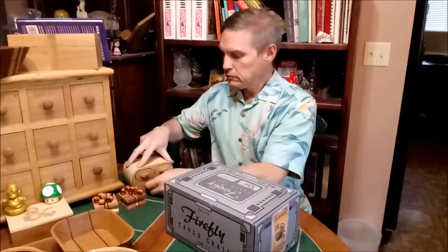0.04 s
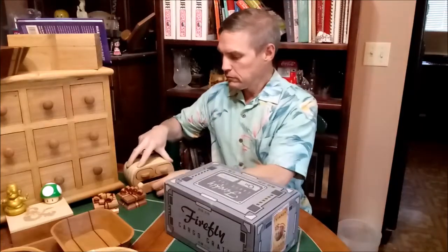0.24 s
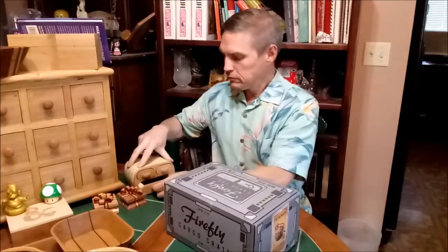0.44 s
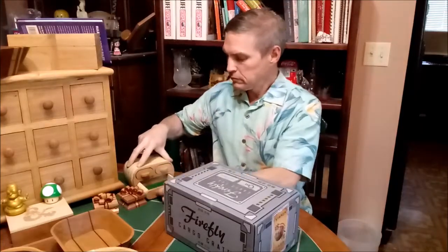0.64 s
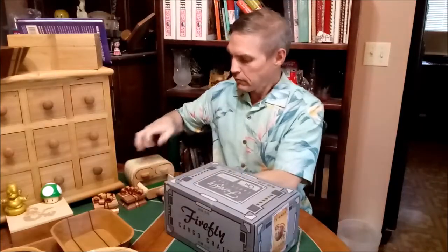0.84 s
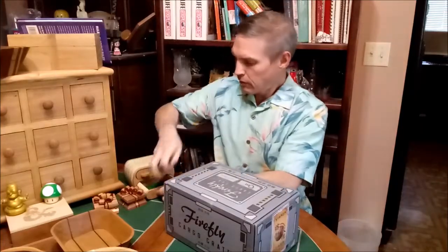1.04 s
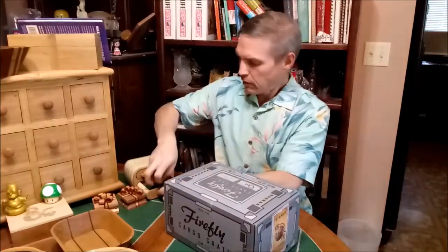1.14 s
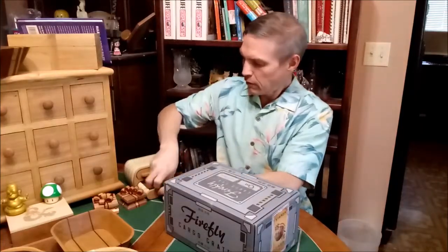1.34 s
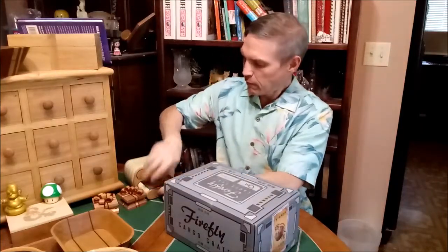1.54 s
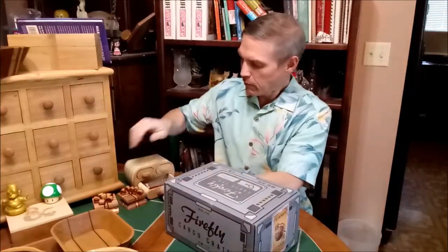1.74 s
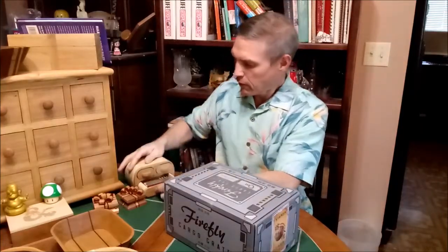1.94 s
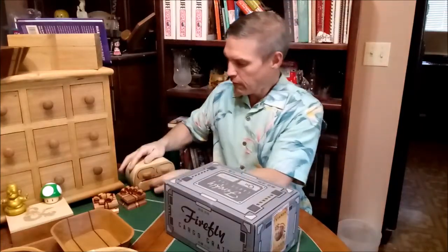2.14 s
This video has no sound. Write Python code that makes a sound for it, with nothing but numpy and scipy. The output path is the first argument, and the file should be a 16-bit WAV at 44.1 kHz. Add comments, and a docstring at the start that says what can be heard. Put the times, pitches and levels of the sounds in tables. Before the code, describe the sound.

A small wooden box is handled on a table indoors. Light taps and scrapes and a brief hollow slide lead to a cluster of sharper knocks and gritty scrapes, with a short room ring over faint hiss.

```python
"""Wooden box on a tabletop

A small wooden box is slid, turned and knocked on a table in a furnished room. Knocks and gritty
stick-slip scrapes ring the same short wooden modes; where the box is touched decides which speak.
A fingertip swishes, a panel glides in its grooves and a nail ticks on the wood.
The table thumps under the hand, and the room rings on over a faint hiss."""
import sys
import numpy as np
from scipy import signal
from scipy.fft import rfft, irfft
from scipy.io import wavfile

SR = 44100
rng = np.random.default_rng(int(sys.argv[2]) if len(sys.argv) > 2 else 0)


def file_out(sig):
    """Save sig as 16-bit WAV at sys.argv[1]."""
    # one column per channel
    cols = np.atleast_2d(sig).T
    # limit, then scale
    lim = np.clip(cols, -1, 1)
    pcm = np.round(lim * 32767).astype(np.int16)
    wavfile.write(sys.argv[1], SR, pcm)


N = 95961

# Colour of the hiss. Each row: frequency in Hz, relative level in dB.
HISS_SPECTRUM = [(40, 3), (120, 11.5), (250, 10.5), (1000, 9), (2500, 5), (5000, -2), (6800, -11),
                 (8500, -0.5), (11000, 2), (16000, -3.5)]
# The room's tail. Each row: band centre in Hz, t60 in seconds, level in dB.
ROOM_BANDS = [(120, 0.34, 0.5), (488, 0.49, -6.5), (890, 0.36, 1.5), (1500, 0.61, -4), (2800, 0.44, -1),
              (5370, 0.51, -6.5), (9000, .3, -11)]
# Pitches that linger in the room, in Hz, and the level of each in dB.
ROOM_RING_HZ = [420, 526, 974, 1186, 1267, 1364, 1488, 1549, 1633, 1787, 2814, 2960]
ROOM_RING_DB = [-32, -31.5, -31, -23, -27, -29, -28.5, -31.5, -28, -28, -34, -37.5]

# Boom of the table. Each row: frequency in Hz, t60 in seconds, level in dB.
TABLETOP_MODES = [(70.6, 0.052, -19.5), (125.3, 0.24, -4.5), (161, 0.2, -10), (246.7, 0.029, -7.5)]
# Hand and box bumping the table. Each row: start in seconds, level in dB.
TABLE_THUMPS = [(0.01, -37), (0.125, -33.5), (.895, -28.5), (1.336, -23), (1.4, -29), (1.488, -22.5),
                (1.658, -22), (1.696, -21), (1.763, -22), (2.091, -21.5)]
# Hollow ring of the sliding panel. Each row: frequency in Hz, t60 in seconds, level in dB.
SLIDE_MODES = [(454, .02, -17.5), (1328, 0.0066, -6), (1584, 0.012, 0.5), (2057, 0.029, -15),
               (2944, .018, -6), (3370, 0.0068, -13.5), (4740, .005, -6.5), (7350, .004, -27)]
# Wood ringing under a nail. Each row: frequency in Hz, t60 in seconds, level in dB.
NAIL_MODES = [(2950, 0.018, -0.5), (3730, 0.011, -4), (4500, 0.0032, -5.5), (5330, 0.0077, -4.5),
              (6200, 0.0045, -12), (10000, .002, -22)]
# Fingernail ticks. Each row: start in seconds, level in dB.
NAIL_TICKS = [(1.3202, -46.5), (1.3362, -23.5), (1.6541, -21.5)]

# Voice of the box. Each row: frequency in Hz, t60 in seconds, struck level in dB, rubbed level in dB.
WOOD_MODES = [(331, .03, -16.5, -17.5), (414.6, 0.079, -14, -5.5), (526, 0.052, -5.5, -0.5),
              (654, 0.014, -20, -16.5), (885.5, 0.023, -13, -8.5), (1034, 0.021, -13, -8.5),
              (1405, 0.011, -5.5, -3), (1573, 0.021, -3.5, -4), (1811, 0.013, -7, -6),
              (2513, 0.0035, -10, -15.5), (2917, 0.0086, -8.5, -5), (3315, 0.01, -15, -5.5),
              (3910, 0.0044, -21, -10), (4647, 0.0077, -13.5, -4.5), (5530, 0.0079, -23.5, -6.5),
              (7520, 0.0028, -19, -5)]
# Crossovers in Hz between its four mode families, low to high: thud, hollow, clack and edge.
FAMILY_SPLITS_HZ = [720, 1180, 1700]
# Scrapes of the box. Each row: fastest moment, rise and fall in seconds, level in dB, then the touch:
# thud, hollow and edge trims in dB against the clack, contact bandwidth in Hz, low-mode pitch ratio.
BOX_SCRAPES = [(0.276, 0.0563, 0.037, -64.5, 9, 12.5, 1, 9940, 0.99),
               (.335, 0.046, 0.027, -50, 2.5, 3, 1.5, 9800, 1.03),
               (0.495, 0.026, 0.027, -62.5, 11.5, 18, 0, 7000, 0.866),
               (0.894, 0.031, 0.016, -66, 7.5, -1, -25, 2900, 0.776),
               (1.362, 0.029, 0.047, -64.5, 2.5, -2, 8.5, 9000, 1.02),
               (1.637, 0.037, 0.037, -59.5, 9, 2, -4, 8070, 0.88),
               (1.727, 0.051, 0.06, -40, -7.5, -9, -5, 5350, 0.99),
               (2.078, 0.0447, 0.033, -50.5, 6, -39, -1.5, 7850, 0.93),
               (2.162, 0.0704, 0.1, -44.5, -1, -0.5, -4.5, 6390, 0.79)]
# Knocks and bumps. Each row: start in seconds, level in dB, then the same five touch settings.
BOX_KNOCKS = [(0.061, -50, 20.5, 15.5, -10, 1960, 0.89), (.113, -39, 18.5, 20, -16, 2500, 1),
              (.124, -44, 23, 19, -22, 1860, 1.15), (0.2, -44.5, 21.5, -4, -2, 2500, 1.2),
              (0.312, -23.5, -8, 15.5, -12, 4000, 0.992), (.322, -24.5, 5, -8, 0, 4000, 1.16),
              (.329, -20.5, 11.5, 2, -13, 4000, 1.04), (0.35, -29, 15, -22, 2.5, 5000, 0.87),
              (.490, -29.5, 12.5, 17, -22, 2500, 0.934), (0.522, -34, 17, 15.5, -17.5, 2000, 1.01),
              (0.879, -31, 14.5, 3.5, -20, 2950, 0.98), (.889, -33, 4, 1, -10, 2000, .85),
              (1.3985, -5, -24, -25, 7, 3090, 0.63), (1.4003, 3.5, -11, -21.5, 1, 3600, 1.02),
              (1.4050, -2.5, -7, -9.5, -18, 3000, 0.88), (1.441, -12, -6.5, -8.5, -23, 3000, 1.08),
              (1.490, -24.5, 7.5, -5, 14, 2430, 0.893), (1.527, -22.5, 6.5, -14, 7.5, 2540, 0.96),
              (1.564, -23.5, -17, -4, 6.5, 3960, 1.8), (1.611, -13.5, 0.5, -20, -24, 2540, 0.964),
              (1.6572, 6.5, -9.5, -28, -8.5, 5970, 1), (1.692, 5, -14, -17, -1, 5500, 0.96),
              (1.700, -4.5, -17, -13, -13, 4000, 0.84), (1.738, -9, -3, -7.5, 0, 2970, 1.036),
              (1.747, -8.5, -3.5, -12, 1, 2970, 0.88), (2.008, -23.5, -1, -25.5, -26, 3000, 0.963),
              (2.031, -32.5, 13, -6.5, -17, 2500, 1.05), (2.091, -12.5, 8, 1.5, -5, 4000, 1.024),
              (2.106, -22, 6.5, -11, 4.5, 5000, 0.88)]


def undb(db):
    """Decibels to gain."""
    return 10 ** (np.asarray(db) / 20)


def rolloff(x, order, hz, kind="low"):
    """Smooth low-pass or high-pass filter."""
    return signal.sosfilt(signal.butter(order, hz, kind, fs=SR, output="sos"), x)


def add(out, start_s, sound):
    """Mix a sound in at a given time."""
    i = max(int(start_s * SR), 0)
    out[i:i + len(sound)] += sound[:max(N - i, 0)]


def ring(hz, t60, db, build_cycles=0.76):
    """Damped modes that swell briefly and die, neighbours in opposite sign; db sets each one's energy."""
    t = np.arange(int(min(1.2 * max(t60), 1) * SR)) / SR
    cycles = hz[:, None] * t
    envelopes = (1 - np.exp(-cycles / build_cycles)) * np.exp(-np.log(1000) * t / t60[:, None])
    modes = envelopes * np.sin(2 * np.pi * cycles)
    gains = undb(db) * (-1) ** np.arange(len(hz)) / np.linalg.norm(modes, axis=1)
    return gains @ modes


def grit(decay_s):
    """A dying burst of noise with unit energy."""
    t = np.arange(SR // 20) / SR
    burst = rng.standard_normal(len(t)) * np.exp(-t / decay_s)
    return burst / np.linalg.norm(burst)


def contact(crunch_s, crunch_db):
    """Force of one touch: an impulse, then a short bright crunch as rough surfaces crush."""
    force = undb(crunch_db) * rolloff(grit(crunch_s), order=2, hz=3000, kind="high")
    force[0] += 1
    return force


def stroke(peak_s, rise_s, fall_s):
    """Speed of one push of the hand: it swells to its fastest moment and fades."""
    t = np.arange(N) / SR
    return np.exp(-((t - peak_s) / np.where(t < peak_s, rise_s, fall_s)) ** 2)


def hiss(level_db=-70.5):
    """A faint, steady bed of background noise."""
    hz, db = np.array(HISS_SPECTRUM).T
    f = np.arange(N // 2 + 1) * SR / N
    colour = undb(np.interp(np.log(f + 1), np.log(hz), db))
    noise = irfft(rfft(rng.standard_normal(N)) * colour, N)
    return undb(level_db) * noise / noise.std()


def room(direct, predelay_s=0.005, build_s=0.0016, ring_t60_s=0.48):
    """A diffuse tail that builds up and dies band by band, with a few lingering resonances."""
    t, f = np.arange(SR) / SR, np.arange(SR // 2 + 1)
    hz, t60, db = np.array(ROOM_BANDS).T
    spectrum, response = rfft(rng.standard_normal(SR)), np.zeros(N)
    for k, solo in enumerate(np.eye(len(hz))):
        band = irfft(spectrum * np.interp(np.log(f + 1), np.log(hz), solo), SR)
        envelope = (1 - np.exp(-t / build_s)) * np.exp(-np.log(1000) * t / t60[k])
        add(response, predelay_s, undb(db[k]) * band * envelope / np.linalg.norm(envelope))
    resonances = ring(np.array(ROOM_RING_HZ), np.full(len(ROOM_RING_HZ), ring_t60_s), ROOM_RING_DB)
    add(response, predelay_s, resonances)
    return signal.fftconvolve(direct, response)[:N]


def table_thumps():
    """Soft blows set the table's low modes booming."""
    out, table = np.zeros(N), ring(*np.array(TABLETOP_MODES).T)
    for start, db in TABLE_THUMPS:
        add(out, start, undb(db) * table)
    return rolloff(out, order=2, hz=400)


def fingertip_swish(centre_hz=4580, width_hz=1400, level_db=-71):
    """A fingertip brushes the wood with a thin, high hiss."""
    band = signal.iirpeak(centre_hz, centre_hz / width_hz, fs=SR)
    brush = signal.lfilter(*band, signal.lfilter(*band, rng.standard_normal(N)))
    return undb(level_db) * brush / brush.std() * stroke(peak_s=0.025, rise_s=0.07, fall_s=0.05)


def panel_slide(drive_db=-48.5):
    """A panel glides in its grooves: smooth friction lets its hollow modes ring freely."""
    friction = undb(drive_db) * rng.standard_normal(N) * stroke(peak_s=0.682, rise_s=0.06, fall_s=0.072)
    return signal.oaconvolve(friction, ring(*np.array(SLIDE_MODES).T))[:N]


def nail_ticks():
    """A nail catches the wood, drags on briefly and rings only its highest modes."""
    out, tick = np.zeros(N), ring(*np.array(NAIL_MODES).T)
    for start, db in NAIL_TICKS:
        scratch = contact(crunch_s=0.0051, crunch_db=3)
        add(out, start, undb(db) * signal.fftconvolve(scratch, tick))
    return rolloff(out, order=3, hz=7850)  # a soft nail gives little top end


def surface_snaps(trim_db=-42.5, centre_hz=9000, q=np.pi):
    """The struck surface spits a little high noise, in proportion to each knock."""
    out = np.zeros(N)
    for start, db, *_ in BOX_KNOCKS:
        add(out, start, undb(db + trim_db) * grit(decay_s=0.004))
    return signal.lfilter(*signal.iirpeak(centre_hz, q, fs=SR), out)


def box_ring(thud_db, hollow_db, edge_db, contact_hz, pitch, rubbed):
    """The box's ring for one touch: a softer contact dulls the high modes, the grip shifts the low ones."""
    hz, t60, struck_db, rubbed_db = np.array(WOOD_MODES).T
    family = np.searchsorted(FAMILY_SPLITS_HZ, hz)
    trim_db = np.array([thud_db, hollow_db, 0, edge_db])[family]
    db = (rubbed_db if rubbed else struck_db) + trim_db
    gripped_hz = np.where(family < 2, hz * pitch, hz)
    return rolloff(ring(gripped_hz, t60, db), order=2, hz=contact_hz)


def box_scrapes(slips_per_s=6000, table_send_db=-23.5):
    """Dense, uneven slips drive the box with each push; a share of the thud shakes the table."""
    out, table = np.zeros(N), ring(*np.array(TABLETOP_MODES).T)
    slips = (rng.random(N) < slips_per_s / SR) * rng.standard_normal(N)
    for peak, rise, fall, db, thud_db, *touch in BOX_SCRAPES:
        force = undb(db) * slips / slips.std() * stroke(peak, rise, fall)
        out += signal.oaconvolve(force, box_ring(thud_db, *touch, rubbed=True))[:N]
        out += undb(table_send_db + thud_db) * signal.oaconvolve(force, table)[:N]
    return out


def box_knocks():
    """Each crunchy contact rings the box once."""
    out = np.zeros(N)
    for start, db, *touch in BOX_KNOCKS:
        blow = contact(crunch_s=0.011, crunch_db=-3)
        add(out, start, undb(db) * signal.fftconvolve(blow, box_ring(*touch, rubbed=False)))
    return out


def scene():
    """Box and table, heard directly and through the room, with dry snaps and hiss on top."""
    wood = rolloff(box_knocks() + box_scrapes(), order=6, hz=5525)  # wood radiates little above this
    direct = wood + panel_slide() + fingertip_swish() + nail_ticks() + table_thumps()
    return (direct + room(direct) + hiss() + surface_snaps())[None]


def record(dry):
    """A steep high cut takes the very top off the mix."""
    top_hz = 15800
    return signal.sosfilt(signal.ellip(10, 0.2, 70, top_hz, fs=SR, output="sos"), dry)


dry = scene()
out = record(dry)
file_out(out)
```